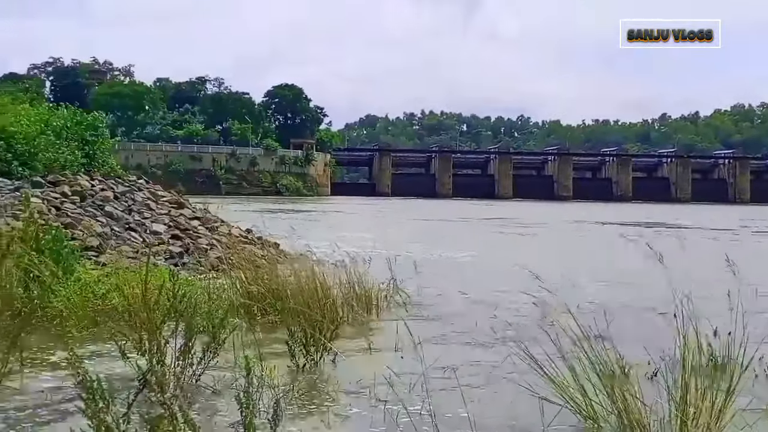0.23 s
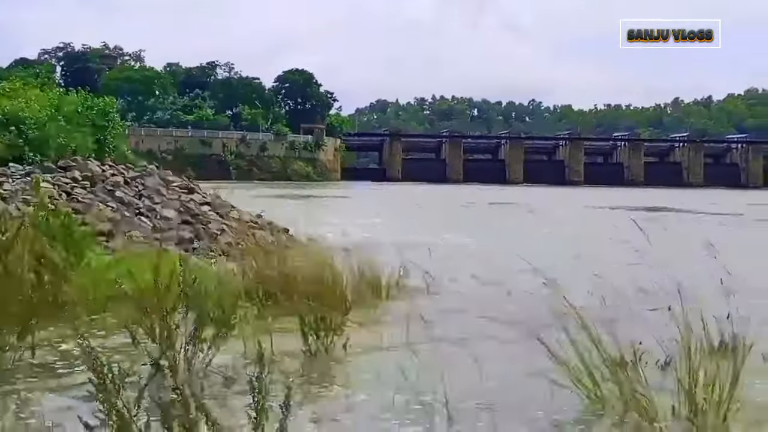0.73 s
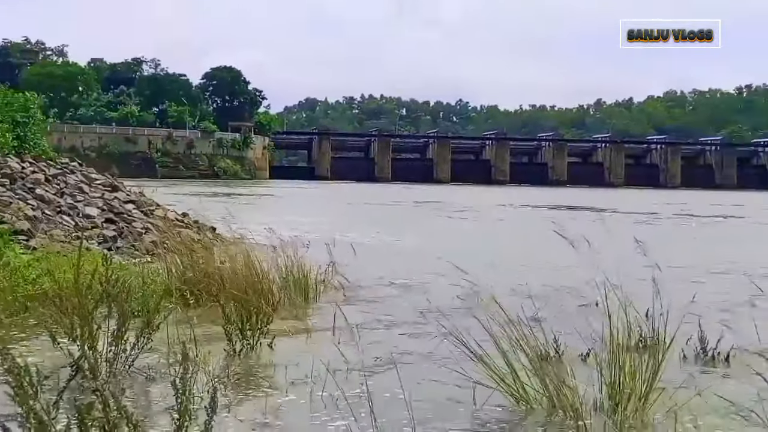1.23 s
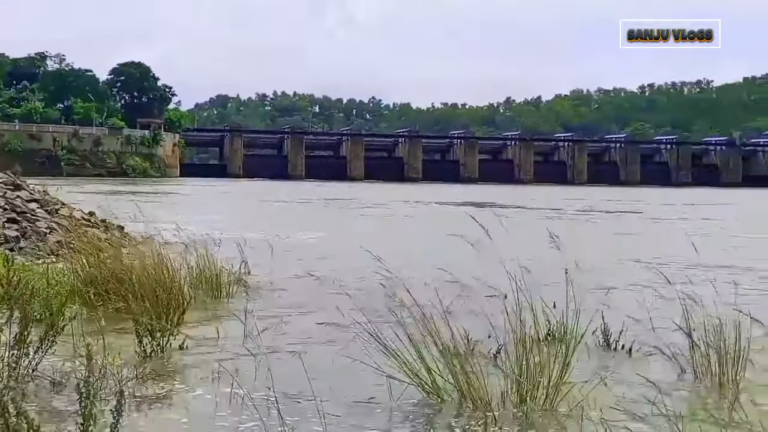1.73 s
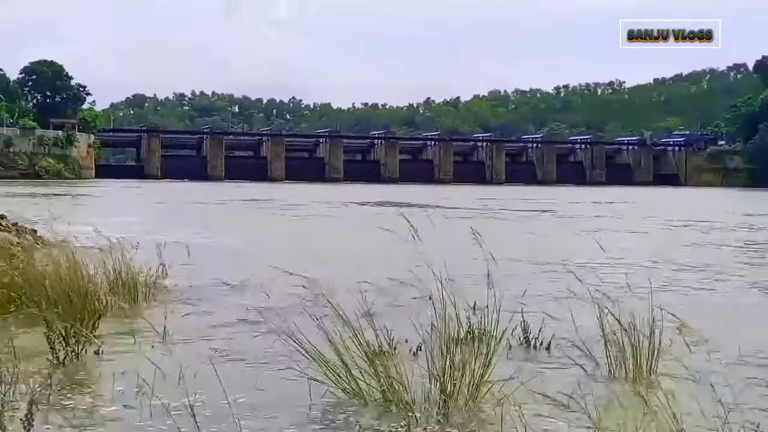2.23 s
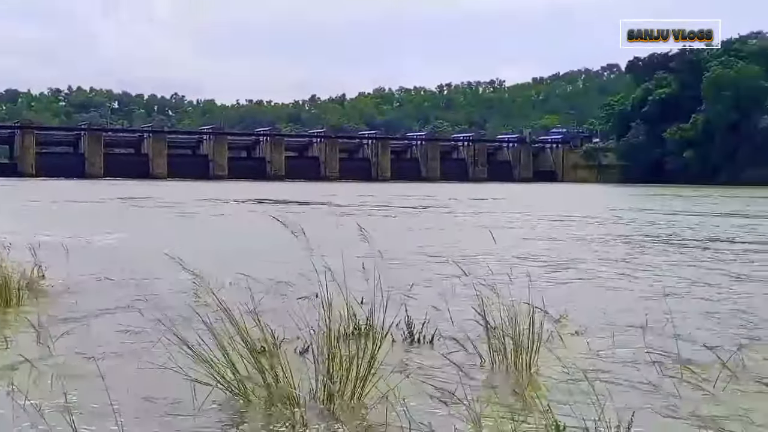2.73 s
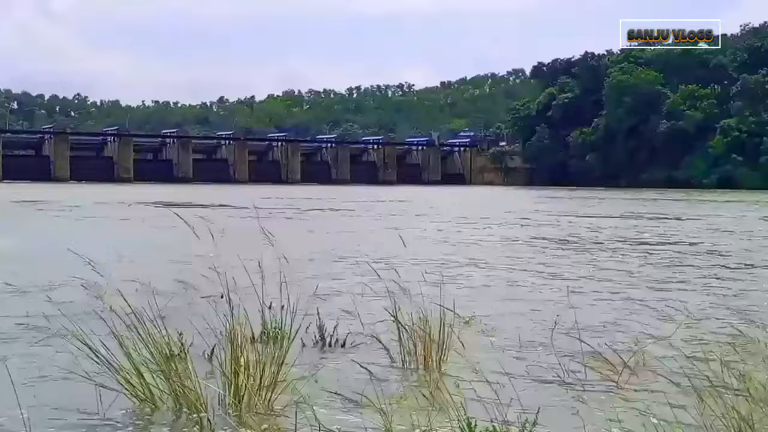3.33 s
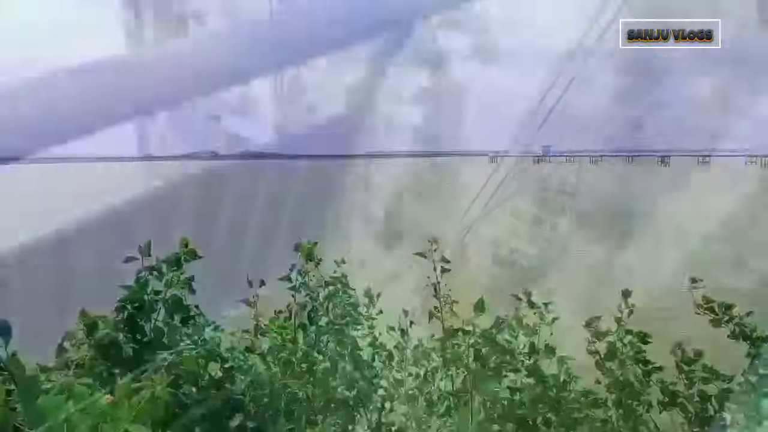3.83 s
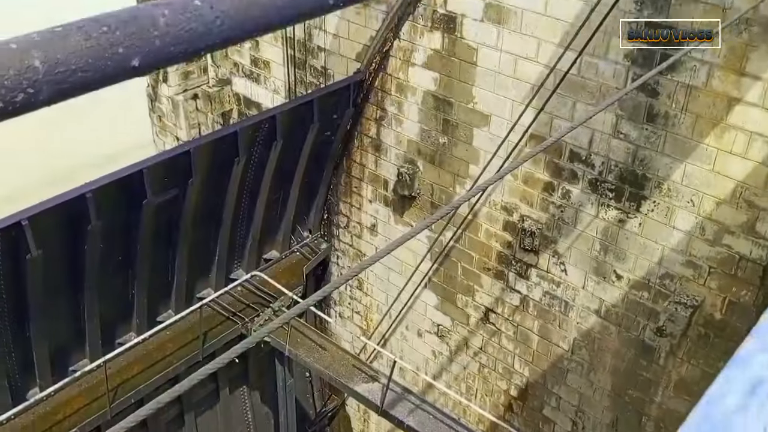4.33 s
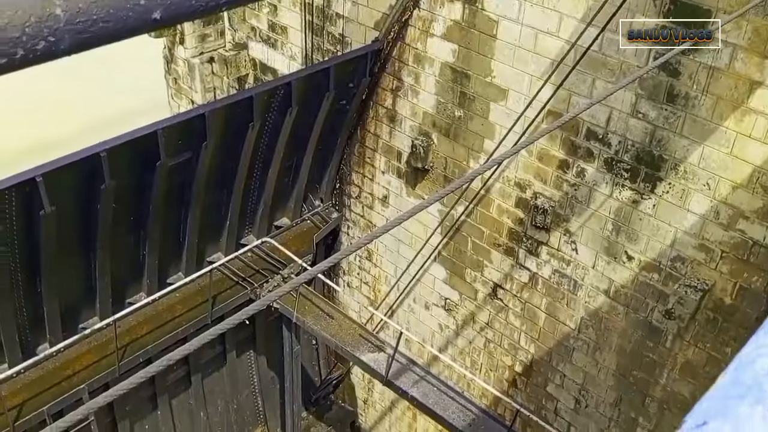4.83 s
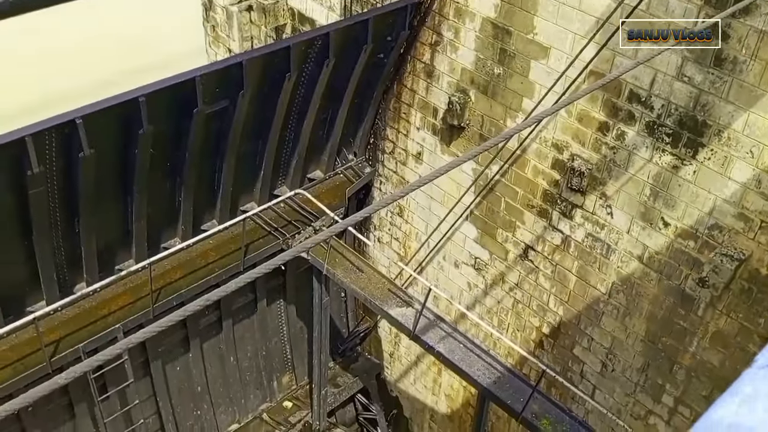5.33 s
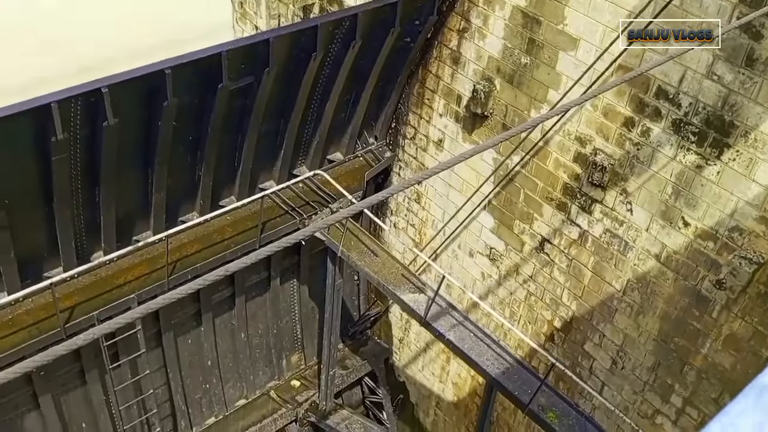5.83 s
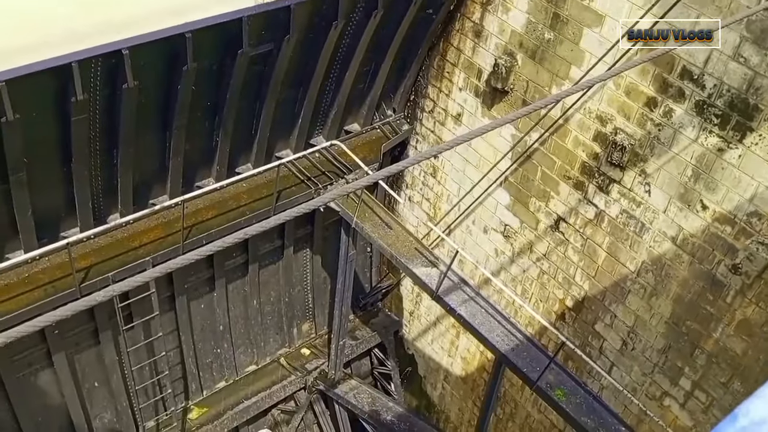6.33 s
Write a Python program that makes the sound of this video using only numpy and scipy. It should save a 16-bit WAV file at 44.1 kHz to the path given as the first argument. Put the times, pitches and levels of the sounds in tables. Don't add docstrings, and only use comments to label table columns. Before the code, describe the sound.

From 0 to about 3.4 seconds we are on an open riverbank. A distant, dull, smooth roar of floodwater sits low in level, rising slightly towards 2.8 seconds. Short wind gusts buffet the small microphone with soft low flutters and thumps, notably around 0.8, 2.5, 2.9 and 3.1-3.5 seconds. Fine dry grass ticks are scattered throughout, with tiny water drips near 1.5, 2.1, 2.4 and 2.8. From 3.4 to 4.3 seconds the bank dissolves into a close sluice, far louder. A plunging jet gives a deep, booming rumble and dense, bright, bubbling spray, nearly constant until 6.6, with slight surges near 5.2 and 5.55 and a brief ebb around 5.4. Beneath it, a steel gate hums in low wavering swells, strongest near 4.4 seconds. The image is central, the top end muffled.

```python
import sys
import numpy as np
from scipy import signal
from scipy.fft import rfft, irfft, next_fast_len
from scipy.io import wavfile
from scipy.ndimage import uniform_filter1d, map_coordinates

SR = 44100
rng = np.random.default_rng(int(sys.argv[2]) if len(sys.argv) > 2 else 0)


def output_pcm(signal):
    pcm = np.clip(np.atleast_2d(signal).T, -1, 1) * 32767
    wavfile.write(sys.argv[1], SR, np.round(pcm).astype(np.int16))


def level_to_linear(level):
    exponent = np.asarray(level, float) / 20
    return 10 ** exponent


N = 289737

# freq_hz, density_db_per_hz
RIVER_SPECTRUM = [(60, -12), (170, -1), (400, -7.5), (460, -17), (600, -10.5), (880, -14), (1020, -20),
                  (2000, -19.5), (3100, -27), (3350, -35.5), (3850, -34.5), (4150, -36), (4500, -29),
                  (6100, -25.5)]
# freq_hz, gain_db
AIR_LOSS = [(25, -9), (60, -0.5), (6100, 1), (8200, -7), (11000, -20.5), (13400, -8), (15500, -7)]
# freq_hz, gain_db
MICROPHONE = [(3000, 0.5), (3750, 1), (3930, -3), (4510, -18.5), (5030, -9), (6090, -2), (7000, -6.5),
              (7970, -13.5), (9360, -9.5), (10400, -8.5), (11400, -12), (13600, -32), (15100, -28.5),
              (15750, -31)]


def unit(x):
    return x / np.sqrt(np.mean(x ** 2) + 1e-20)


def along(points, hz):
    f, v = np.transpose(points)
    return np.interp(np.log(hz + 1), np.log(f + 1), v)


def curves(rows):
    s, *cols = np.transpose(rows)
    return [np.interp(np.arange(N) / SR, s, c) for c in cols]


def wobble(rate_hz):
    return map_coordinates(rng.standard_normal(400), [np.arange(N) * rate_hz / SR])


def coloured(x, spectrum):
    m = next_fast_len(N + 8192)
    gain = level_to_linear(along(spectrum, np.fft.rfftfreq(m, 1 / SR)))
    return irfft(rfft(x, m) * gain, m)[..., :N]


def add(x, start_s, burst):
    part = x[round(start_s * SR):][:len(burst)]
    part += burst[:len(part)]


def patches(shape, bins, frames):
    field = uniform_filter1d(rng.standard_normal(shape), size=bins, axis=0)
    return unit(uniform_filter1d(field, size=frames, axis=1))


def rush(spectrum, patchy_db, streaky_db, size=1024, grains=0):
    overlap = size * 3 // 4
    z = signal.stft(rng.standard_normal(N) + grains, nperseg=size, noverlap=overlap)[2]
    fading = along([(3500, 1.1), (9000, 1.0)], np.fft.rfftfreq(size, 1 / SR))[:, None]
    swells_db = patchy_db * patches(z.shape, 12, 12)
    streaks_db = streaky_db * fading * patches(z.shape, 2, 10)
    noise = signal.istft(z * level_to_linear(swells_db + streaks_db), nperseg=size, noverlap=overlap)[1][:N]
    return unit(coloured(noise, spectrum))


def river():
    # time_s, level_db
    bank = [
        (0.0, -38.8),
        (1.3, -38),
        (2.0, -37.5),
        (2.8, -36.7),
        (3.2, -38),
        (3.5, -37),
    ]
    level_db = curves(bank)[0] + 0.4 * wobble(6.03)
    return level_to_linear(level_db) * coloured(rush(RIVER_SPECTRUM, patchy_db=0.36, streaky_db=1.72), AIR_LOSS)


def gusts():
    # start_s, length_s, level_db
    blows = [(0.0, 0.077, -43.5), (0.351, 0.064, -32.5), (0.476, .03, -41), (0.56, 0.17, -36),
             (0.78, .1, -34), (0.898, 0.16, -35), (1.197, 0.15, -36.5), (1.39, 0.07, -35.5),
             (1.5, 0.176, -34.5), (1.754, 0.026, -31), (1.834, 0.088, -36.5), (2.128, 0.1, -37.5),
             (2.33, 0.15, -38), (2.519, .13, -29.5), (2.76, .07, -38), (2.89, 0.14, -35),
             (3.075, 0.37, -28), (3.362, 0.13, -33), (3.484, 0.069, -29), (3.557, .8, -29.5)]
    calm_db, attack_s, release_s = -45, 0.022, 0.054
    t = np.arange(N) / SR
    levels_db = []
    for start_s, length_s, db in blows:
        rise = (t - start_s) / attack_s + .5
        fall = (start_s + length_s - t) / release_s + .5
        levels_db.append(calm_db + (db - calm_db) * np.clip(np.minimum(rise, fall), 0, 1))
    return np.max([np.full(N, -np.inf)] + levels_db, axis=0)


def wind():
    # freq_hz, density_db_per_hz
    buffet = [(25, -52), (60, -2.5), (130, 5.5), (220, -2.5), (400, -11), (520, -21), (1000, -76)]
    # start_s, peak_db, pitch_hz, t60_s
    thumps = [(0.78, -5.5, 225, 0.059), (0.812, -9, 85, 0.1), (0.843, -9.5, 137, 0.13),
              (0.982, -15, 142, 0.15), (1.116, -22, 134, 0.15), (1.391, -21, 145, 0.15),
              (1.501, -23, 171, 0.15), (1.753, -21, 198, 0.15), (2.55, -36, 61.9, 0.14),
              (2.552, -14, 204, 0.14), (2.778, -15, 150, 0.11), (2.885, -9, 208, 0.18),
              (3.098, -15, 136, 0.21), (3.186, -6.5, 134, 0.12)]
    turbulence = unit(level_to_linear(0.17 * wobble(25.6)) * rush(buffet, patchy_db=1.4, streaky_db=-3.5))
    x = level_to_linear(gusts()) * turbulence
    t = np.arange(SR // 5) / SR
    rise = 1 - np.exp(-t / .006)
    for start_s, db, hz, t60_s in thumps:
        ring = level_to_linear(-60 * t / t60_s) * np.sin(2 * np.pi * hz * t)
        slap = 0.34 * level_to_linear(-60 * t / 0.074) * np.sin(2 * np.pi * 1.74 * hz * t)
        add(x, start_s, level_to_linear(db - 8.5) * rise * (ring + slap))
    return x


def stems():
    # start_s, level_db, middle_hz
    clear = [(0.1245, -71, 11500), (0.541, -55, 7000), (1.0453, -71, 13200), (1.2115, -64, 7900),
             (1.3762, -74, 12100), (1.4401, -75, 12000), (1.5115, -37, 6300), (1.5199, -72, 12500),
             (1.5417, -61, 8700), (1.6476, -71, 11600), (1.7615, -71, 11800), (1.89, -68, 10400),
             (1.9698, -64, 11400), (2.0133, -65, 10800), (2.0612, -67, 10500), (2.1766, -46, 6200),
             (2.3696, -46, 6500), (2.4385, -71, 11200), (2.596, -66, 10400), (2.6882, -67, 10900),
             (1.52, -58, 8200), (2.8057, -64, 12500), (2.8529, -60, 7900), (2.9015, -69, 11500),
             (2.9429, -53, 6600), (2.9545, -54, 7500), (1.5075, -60, 9000), (3.1475, -76, 12000),
             (3.3971, -57, 8700), (3.4065, -53, 7600)]
    # start_s, end_s
    stir_spans = [
        (0.1, 3.05),
        (1.9, 2.1),
        (2.6, 3.0),
    ]
    stir_db, scatter_db, low_hz, high_hz = -20, 4, 7500, 15000

    def path_db(hz):
        return sum(along(colour, hz) for colour in (RIVER_SPECTRUM, AIR_LOSS, MICROPHONE))

    when, pitch, size = rng.random((100, 3)).T
    start_s, end_s = np.repeat(stir_spans, (55, 12, 33), axis=0).T
    faint = zip(start_s + when * (end_s - start_s), stir_db + scatter_db * size,
                low_hz * (high_hz / low_hz) ** pitch)
    return [(s, db - path_db(hz), hz) for s, db, hz in clear] + list(faint)


def edge():
    # start_s, peak_db, pitch_hz, t60_s
    drops = [
        (1.488, -37, 2550, 0.021),
        (1.499, -39, 2550, 0.022),
        (1.5149, -28.5, 2610, 0.017),
        (1.5304, -40, 2750, 0.019),
        (1.536, -40, 2650, 0.022),
        (2.1126, -40, 2650, 0.022),
        (2.3704, -32.5, 2900, 0.013),
        (2.7711, -43, 2800, 0.022),
        (2.7841, -34, 3030, 0.022),
        (2.806, -38, 2900, 0.022),
    ]
    tick_width = 1.11
    drips, ticks, t = np.zeros(N), np.zeros(N), np.arange(SR // 20) / SR
    rise = 1 - np.exp(-t / .001)
    for start_s, db, hz, t60_s in drops:
        ring = level_to_linear(-60 * t / t60_s) * np.sin(2 * np.pi * hz * t * (1 + t))
        echoes = rng.standard_normal(len(t)) * level_to_linear(-60 * t / 0.02)
        scatter = signal.fftconvolve(ring, echoes)[:len(t)]
        add(drips, start_s, level_to_linear(db + 3) * rise * (ring + .06 * scatter))
    for start_s, db, hz in stems():
        edges_hz = [hz / tick_width, min(hz * tick_width, SR / 2.2)]
        band = signal.butter(2, edges_hz, "bandpass", fs=SR, output="sos")
        puff = signal.sosfilt(band, rng.standard_normal(len(t)) * level_to_linear(-60 * t / 0.015) * rise)
        add(ticks, start_s, level_to_linear(db + 16) * puff / np.linalg.norm(puff))
    return drips + coloured(coloured(ticks, RIVER_SPECTRUM), AIR_LOSS)


def gate():
    # (middle_s, level_db, length_s)
    plates = [
        (70, [(3.95, -38, .2), (4.23, -26, 0.45), (4.54, -26, .18), (4.76, -29, 0.12), (5.35, -34, .12), (5.53, -36, .1)]),
        (116.9, [(4.1, -29, 0.12), (4.41, -25, 0.13), (4.93, -30, 0.23), (5.28, -26.5, .16), (5.62, -30, 0.43), (6.05, -24.5, 0.22), (6.36, -31, .1)]),
        (137.1, [(3.88, -30.5, 0.17), (4.35, -21, 0.15), (4.59, -24, 0.075), (5.7, -25.5, .18), (6.0, -27, 0.13)]),
        (176.5, [(4.4, -30, 0.089), (4.68, -28, 0.34), (4.9, -26.5, 0.21), (5.82, -23.5, 0.14), (6.1, -30, .1), (6.34, -33, .1)]),
    ]
    rest_db = -48.5
    t = np.arange(N) / SR
    hum = np.zeros(N)
    for hz, swells in plates:
        shaken = level_to_linear(rest_db)
        for middle_s, db, length_s in swells:
            shaken = shaken + level_to_linear(db) * np.exp(-2 * ((t - middle_s) / length_s * 2) ** 2)
        hum += np.sqrt(2) * shaken * np.sin(2 * np.pi * hz * t + 0.3 * wobble(4.4))
    return hum


def bubbles(count, mid_hz, spread, cycles, scatter_db):
    when = rng.random(count)
    size = np.minimum(rng.exponential(size=count), 3)
    hz = np.clip(mid_hz * np.exp(spread * rng.standard_normal(count)), 300, 14000)[:, None]
    turns = hz * np.arange(500) / SR
    tone = np.sin(2 * np.pi * turns * (1 + .12 * turns / cycles))
    rings = tone * np.exp(-3 * turns / cycles) * (1 - np.exp(-2 * turns))
    at = (when * N).astype(int)[:, None] + np.arange(500)
    return unit(np.bincount(at.ravel(), (level_to_linear(scatter_db * size)[:, None] * rings).ravel())[:N])


def sluice():
    # freq_hz, density_db_per_hz
    plunge = [(10, -50), (25, -25), (56, -11.5), (90, -1.5), (240, 1), (420, -6.5), (670, -19), (1200, -17),
              (3000, -77)]
    spray_spectrum = [(60, -60), (200, -3), (500, 2.5), (670, -0.5), (930, 1), (1300, -3), (1540, 0),
                      (1800, -2), (3100, -1), (16000, 3.5)]
    # time_s, level_db
    surge = [
        (4.4, -20.5),
        (4.93, -20),
        (5.07, -22),
        (5.2, -19.5),
        (5.39, -23.5),
        (5.55, -19.5),
        (5.7, -21),
        (6.57, -20.5),
    ]
    rumble = level_to_linear(curves(surge)[0]) * rush(plunge, patchy_db=-1.0, streaky_db=2.5, size=4096)
    fizz = .3 * bubbles(count=9000, mid_hz=3000, spread=.7, cycles=12, scatter_db=2.5)
    spray_db = -14 + 0.3 * wobble(14) + 0.17 * wobble(30)
    spray = rush(spray_spectrum, patchy_db=0.5, streaky_db=2.0, grains=fizz)
    return rumble + level_to_linear(spray_db) * spray


def scene():
    # start_s, end_s
    dissolve = (3.408, 4.313)
    near = np.interp(np.arange(N) / SR, dissolve, [0, 1])
    bank = river() + wind() + edge()
    mono = (1 - near) * bank + near * sluice() + (near > 0) * gate()
    return np.array([mono, mono])


def low_pass(x):
    return signal.sosfilt(signal.butter(12, 15800, fs=SR, output="sos"), x)


def record(dry):
    # middle_s, low_hz, high_hz, level_db
    splits = [(3.611, 4130, 5300, -63), (4.113, 11580, 13180, -54.5), (4.226, 9050, 11150, -40),
              (4.299, 10210, 11800, -41), (4.98, 4170, 5200, -49), (5.016, 11580, 13350, -50),
              (5.016, 13520, 13910, -65), (5.561, 10980, 12700, -42), (5.968, 7500, 9090, -46),
              (5.999, 9520, 11760, -39), (6.13, 4870, 5810, -38), (6.348, 7540, 9000, -44)]
    side, fade = np.zeros(N), np.hanning(2048) ** .5
    for middle_s, low_hz, high_hz, db in splits:
        band = signal.butter(8, [low_hz, high_hz], "bandpass", fs=SR, output="sos")
        noise = unit(signal.sosfilt(band, rng.standard_normal(4096)))[2048:]
        add(side, middle_s - 1024 / SR, level_to_linear(db) * fade * noise)
    ears = coloured(dry, MICROPHONE) + side * [[1], [-1]]
    heard = coloured(ears, [(15730, 0), (15850, -80)])
    return low_pass(heard)


dry = scene()
out = record(dry)
output_pcm(out)
```